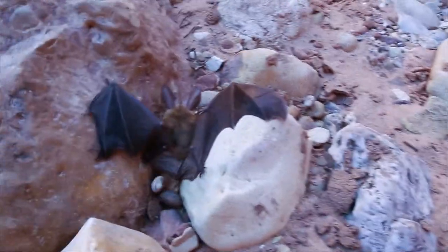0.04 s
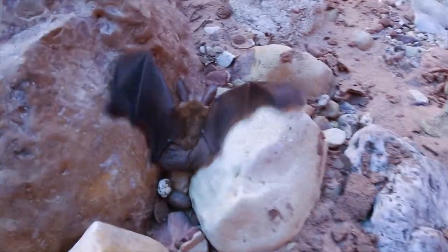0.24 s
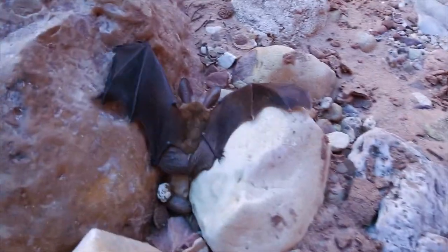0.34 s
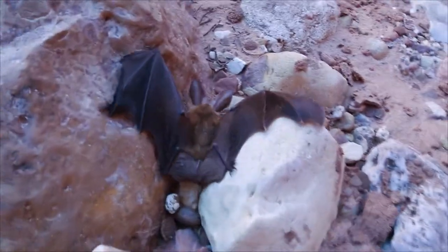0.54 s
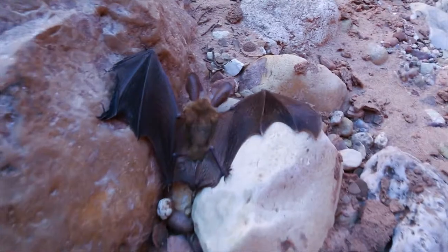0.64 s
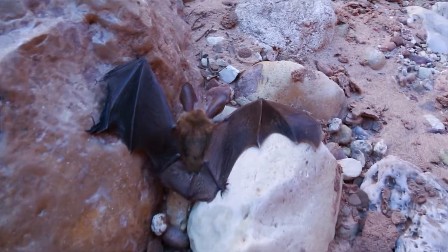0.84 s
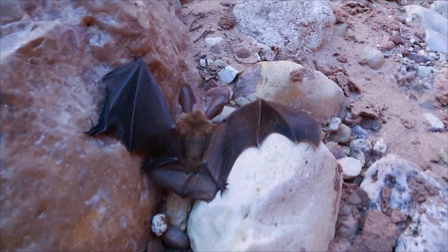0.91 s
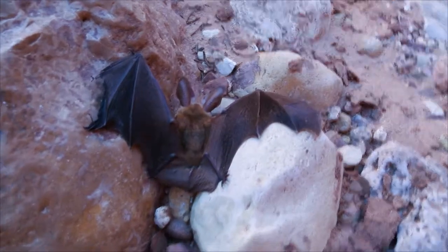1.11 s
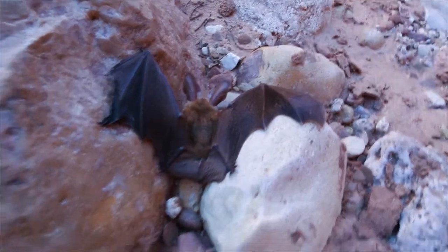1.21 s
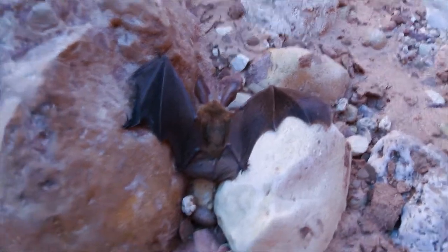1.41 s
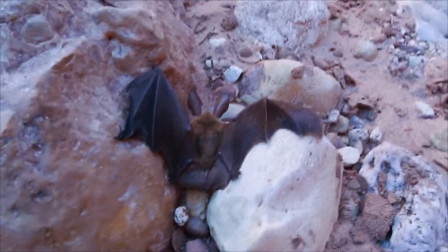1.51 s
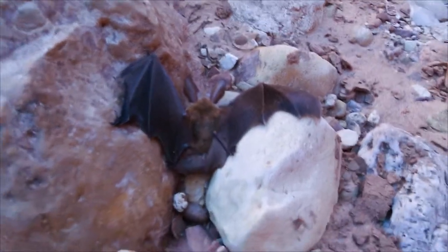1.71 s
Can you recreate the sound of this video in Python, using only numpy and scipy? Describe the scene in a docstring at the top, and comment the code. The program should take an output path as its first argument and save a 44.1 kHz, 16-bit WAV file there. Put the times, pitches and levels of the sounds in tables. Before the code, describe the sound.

A bat squeaks three times, very high and whistling, with a slight echo off rocks. Grit ticks sharply at the start. The first squeak, at 0.25 seconds, begins raspy and is held; shorter falling ones come at 0.5 and 0.7. At 0.8 the camera is knocked, followed by soft hand bumps and grit ticks until 1.1. A faint sleeve rustle and low rumble continue over quiet outdoor air.

```python
"""Grit ticks sharply, then a bat spread on a rock gives three very high squeaks.
Its voice is an almost pure whistle: the first squeak starts with a rasp and is held, the other two fall.
The rocks send back a short echo. Afterwards a hand-held camera is knocked, so that its body rings,
the hand bumps it softly and a sleeve rustles. Quiet outdoor air and a low rumble lie underneath."""
import sys
import numpy as np
from scipy import signal
from scipy.fft import rfft, irfft
from scipy.io import wavfile

SR = 44100
rng = np.random.default_rng(int(sys.argv[2]) if len(sys.argv) > 2 else 0)


def log_audio(samples):
    """Write samples as a 16-bit WAV file to the path given in sys.argv[1]."""
    # one column per channel
    frames = np.atleast_2d(samples).T
    # limit to full scale, then quantise
    limited = np.clip(frames, -1, 1)
    pcm = np.round(limited * 32767).astype(np.int16)
    wavfile.write(sys.argv[1], SR, pcm)


N = 77175
T = np.arange(N) / SR


# The path of each squeak, one list of points per squeak: time_s, pitch_hz, level_db
SQUEAK_PATHS = [
    [(.253, 13600, -20), (.2555, 13300, -7.5), (.261, 13030, -7), (.274, 12980, -7.3), (.287, 12890, -7.5),
     (.291, 12780, -10.3), (.299, 12850, -9), (.301, 13000, -7), (.306, 12840, -10), (.311, 13120, -12),
     (.3165, 12500, -22), (.321, 12000, -16), (.325, 11000, -38)],
    [(.4885, 15900, -42), (.4908, 14900, -7.5), (.494, 13800, -6), (.498, 13400, -7), (.501, 13080, -13),
     (.5035, 12650, -22), (.5062, 12000, -11.5), (.511, 11250, -15), (.513, 10950, -26), (.517, 9600, -40)],
    [(.664, 15800, -42), (.6658, 15000, -13.5), (.6675, 14350, -15), (.670, 14080, -18),
     (.6735, 13600, -36), (.675, 13330, -23), (.678, 13000, -18.5), (.682, 12350, -20.5),
     (.684, 12100, -26), (.692, 11800, -29), (.695, 11600, -42)],
]

def squeaks(wobble_hz=20):
    """The bat's voice: almost pure whistles whose pitch shakes a little."""
    out = np.zeros(N)
    for path in SQUEAK_PATHS:
        time_s, pitch_hz, level_db = np.transpose(path)
        pitch = np.interp(T, time_s, pitch_hz) + wobble_hz * flutter(rate_hz=250)
        loudness = from_db(np.interp(T, time_s, level_db))
        out += loudness * gate(time_s[0], time_s[-1], edge_s=.001) * whistle(pitch)
    return out


# Soft lower notes that come with the squeaks: start_s, length_s, start_hz, end_hz, level_db
LOWER_NOTES = [(0.238, 0.011, 9100, 8200, -23), (.294, .018, 6350, 6850, -56),
               (0.4784, 0.011, 9900, 8340, -29.5), (0.669, 0.01, 6950, 6500, -33)]

def lower_notes(wobble_hz=90, fade_db=10):
    """Short sliding notes in the bat's voice that start quickly and fade."""
    out = np.zeros(N)
    for start_s, length_s, start_hz, end_hz, level_db in LOWER_NOTES:
        progress = np.clip((T - start_s) / length_s, 0, 1)
        pitch = start_hz + (end_hz - start_hz) * progress + wobble_hz * flutter(rate_hz=600)
        loudness = from_db(level_db - fade_db * progress)
        out += loudness * gate(start_s, start_s + length_s, edge_s=.002) * whistle(pitch)
    return out


# Rough spurts of voice before the held squeak: start_s, length_s, level_db
RASP_SPURTS = [(0.2403, .0042, -13), (0.2454, .0096, -11)]
# How strong the hiss in the rasp is, from low to high: frequency_hz, level_db
RASP_HISS_SHAPE = [(300, -43), (1000, -15), (3000, -7.5), (4000, -26.5), (4700, -0.5), (5600, -23.5),
                   (7200, 7), (8700, 5.5), (10000, -12), (12500, 2.5), (16000, -0.5)]

def rasp(pulses_per_s=430, pitch_hz=13550, swing_hz=1300, jitter_hz=600):
    """The voice breaks into fast, uneven pulses, each a tiny falling chirp with hiss."""
    out = np.zeros(N)
    for start_s, length_s, level_db in RASP_SPURTS:
        cycle = ((T - start_s) * pulses_per_s + .07 * flutter(rate_hz=300)) % 1  # 0 to 1 in each pulse
        chirps = whistle(pitch_hz + swing_hz * (1 - 2 * cycle) + jitter_hz * flutter(rate_hz=1800))
        hiss = from_db(-12) * shaped_noise(RASP_HISS_SHAPE)
        pulses = 1 - .8 * np.cos(np.pi * cycle) ** 2
        spurt = gate(start_s, start_s + length_s, edge_s=.0006)
        out += from_db(level_db) * spurt * pulses * (chirps + hiss)
    return out


# Faint hisses leading into the first two squeaks: start_s, length_s, level_db, low_hz, high_hz
BREATHS = [(.198, .05, -55.5, 6500, 11510), (0.473, 0.029, -48.5, 12500, 15500)]

def breaths():
    """Air escapes before the voice catches."""
    out = np.zeros(N)
    for start_s, length_s, level_db, low_hz, high_hz in BREATHS:
        hiss = rms_one(band(rng.standard_normal(N), low_hz, high_hz))
        out += from_db(level_db) * gate(start_s, start_s + length_s, edge_s=.012) * hiss
    return out


# Dry ticks of grit: start_s, peak_db, low_hz, high_hz
GRIT_TICKS = [(.00695, -2, 6500, 10500), (.00705, -13, 2100, 4000), (.0651, -34, 1600, 4500),
              (.0680, -18, 1800, 6000), (.0901, -29, 1800, 5500), (.1047, -29, 1700, 5000),
              (.2325, -31, 11500, 15000), (.3378, -45, 4000, 11000), (.4703, -36, 9000, 15000),
              (.4912, -38, 3000, 9000), (.4944, -39, 3000, 9000), (.6245, -42, 2000, 7000),
              (.8745, -29, 1500, 3300), (.9067, -37, 1500, 9000), (.9135, -39, 3000, 11000),
              (.9293, -27, 1700, 4200), (.9296, -33, 5500, 12000), (.9715, -41, 6000, 13000),
              (1.0140, -40, 6000, 14000), (1.0504, -22, 1500, 4800), (1.0538, -33, 6000, 11000),
              (1.0636, -34, 6000, 11000), (1.0658, -26, 6000, 11500)]

def grit_ticks():
    """Each tick of grit is a snap, a brief crumble and a faint tail."""
    out = np.zeros(N)
    crumble = from_db(-16) * dying(fade_s=.0035)
    tail = from_db(-37) * dying(fade_s=.028)
    for start_s, peak_db, low_hz, high_hz in GRIT_TICKS:
        snap = signal.unit_impulse(N) + (crumble + tail) * rng.standard_normal(N)
        tick = band(snap, low_hz, high_hz)
        tick = band(tick, 1500, 14500, order=4)  # outer limits shared by all ticks
        out += at(start_s, from_db(peak_db) * tick / np.abs(tick).max())
    return out


# The clear echo from the rocks: delay_s, level_db
ROCK_ECHOES = [(.0258, -26)]
# Sound scattered by stony ground, near and far: level_db, fade_s
GROUND_SCATTER = [(-27.5, .12), (-34, .32)]

def rock_echo(sound, build_s=.01):
    """Sound bounces off the rocks once clearly, and off the stony ground as a faint blur."""
    build_up = np.clip(T / build_s, 0, 1)
    scatter = sum(from_db(level_db) * rms_one(rng.standard_normal(N) * dying(fade_s) * build_up)
                  for level_db, fade_s in GROUND_SCATTER)
    blur = signal.fftconvolve(sound, band(scatter, 1500, 13800) / np.sqrt(N))[:N]
    echo = sum(from_db(level_db) * at(delay_s, sound) for delay_s, level_db in ROCK_ECHOES)
    return echo + blur


# Knocks on the camera: start_s, level_db, low_hz, high_hz
CAMERA_KNOCKS = [(0.8017, -3, 238, 3980), (0.8413, -26.5, 375, 746), (0.8412, -32, 1500, 2570),
                 (.8445, -36.5, 2800, 4370), (1.0515, -19, 3240, 4300), (1.0575, -41, 3050, 3600)]
# The tones the camera body rings with: pitch_hz, level_db, fade_s
CAMERA_TONES = [(304, -22, 0.0094), (756, -14, 0.01), (1319, -19.5, 0.037), (2285, -1.5, 0.0041),
                (2886, -3.5, 0.006), (3290, -26, 0.048), (4350, -23, 0.011)]

def camera_knocks():
    """A knock sets the camera ringing; where and how hard it lands picks which tones sound."""
    out = np.zeros(N)
    body = sum(fading_tone(pitch_hz, level_db, fade_s) for pitch_hz, level_db, fade_s in CAMERA_TONES)
    crack = from_db(-23) * band(rng.standard_normal(N) * dying(fade_s=.0043), 6900, 11200)
    for start_s, level_db, low_hz, high_hz in CAMERA_KNOCKS:
        ring = band(body, low_hz, high_hz)
        out += at(start_s, from_db(level_db) * (ring / np.abs(ring).max() + crack))
    return out


# Soft bumps of the hand: start_s, level_db, pitch_hz, fade_s
HAND_BUMPS = [(0.7857, -19, 238, 0.0062), (0.8414, -27, 194, 0.02), (0.905, -30.5, 190, 0.026),
              (1.0498, -29.5, 85, 0.051), (1.0617, -34.5, 293, 0.0088)]

def hand_bumps():
    """The hand pushes on the camera, making low thuds that die almost at once."""
    thuds = sum(at(start_s, fading_tone(pitch_hz, level_db, fade_s))
                for start_s, level_db, pitch_hz, fade_s in HAND_BUMPS)
    return band(thuds, 45, 2700)


# How the rustle swells and sinks: time_s, level_db
SLEEVE_LEVELS = [(.74, -74), (.81, -49.5), (.868, -43.5), (.895, -53.5), (.93, -50), (.955, -56.5),
                 (.99, -45), (1.035, -56), (1.062, -40.5), (1.09, -49), (1.125, -45), (1.185, -61.5),
                 (1.255, -41), (1.315, -56), (1.345, -50.5), (1.39, -56), (1.75, -72)]
# How strong the cloth's hiss is, from low to high: frequency_hz, level_db
SLEEVE_SHAPE = [(100, -11), (300, 2.5), (600, -4.5), (1000, -5.5), (2000, -4), (3200, -1), (4500, -8),
                (6000, -19.5), (10000, -16), (13000, -23.5), (16000, -49)]

def sleeve_rustle(catches_per_s=400, spread_db=4.5):
    """Cloth slides with a soft hiss, and its fibres catch with tiny clicks."""
    sizes = from_db(spread_db * np.minimum(rng.exponential(1, N), 2))
    signs = rng.choice([-1, 1], N)
    caught = rng.random(N) < catches_per_s / SR
    clicks = from_db(-12) * rms_one(band(sizes * signs * caught, 2000, 18000))
    return level_curve(SLEEVE_LEVELS) * (shaped_noise(SLEEVE_SHAPE) + clicks)


# How strong the outdoor air is, from low to high: frequency_hz, level_db
AIR_SHAPE = [(25, -26.5), (55, -6), (75, -6.5), (105, 3), (160, -4.5), (330, -12.5), (700, -14.5),
             (1100, -15.5), (1530, -13.5), (1700, -7), (1880, -9), (2080, -13.5), (2400, -9), (2800, -20.5),
             (3250, -16), (3500, -8), (3720, -8), (4000, -21.5), (5000, -27), (9000, -28.5), (15800, -30.5)]
# How loud the air is, dipping a little around the loud squeaks: time_s, level_db
AIR_LEVELS = [(0, -52), (.24, -52.5), (.3, -54.5), (.53, -54.5), (.64, -51.5), (1.75, -53)]

def outdoor_air():
    """The quiet, nearly steady hush of the outdoors."""
    return level_curve(AIR_LEVELS) * shaped_noise(AIR_SHAPE)


# How loud the rumble is: time_s, level_db
RUMBLE_LEVELS = [(0, -84), (.74, -68.5), (.82, -50), (1.0, -52), (1.3, -50), (1.42, -49), (1.6, -48),
                 (1.75, -52)]
# How strong the rumble is, from low to high: frequency_hz, level_db
RUMBLE_SHAPE = [(25, -26), (60, -12.5), (130, 0.5), (230, -3.5), (340, -11.5), (540, -8), (800, -19.5),
                (1500, -18), (1710, -7), (2000, -17.5), (3000, -19.5), (3700, -14.5), (4200, -35.5),
                (5500, -43), (16000, -66)]

def rumble():
    """A low noise that rises once the camera moves."""
    return level_curve(RUMBLE_LEVELS) * shaped_noise(RUMBLE_SHAPE)


def from_db(db):
    """Turn decibels into a number to multiply by."""
    return 10 ** (np.asarray(db) / 20)


def rms_one(x):
    """Scale a sound so that its average strength (rms) is 1."""
    return x / np.sqrt(np.mean(x ** 2) + 1e-20)


def level_curve(points):
    """Join time_s, level_db points into a volume curve."""
    return from_db(np.interp(T, *np.transpose(points)))


def band(x, low_hz, high_hz, order=2):
    """Keep the part of a sound between low_hz and high_hz."""
    sections = signal.butter(order, [low_hz, high_hz], "band", fs=SR, output="sos")
    return signal.sosfilt(sections, x + 1e-18)


def shaped_noise(shape):
    """Noise of strength 1, shaped by frequency_hz, level_db points."""
    frequency_hz, level_db = np.transpose(shape)
    bins_hz = np.maximum(np.fft.rfftfreq(N, 1 / SR), 1)
    gains = from_db(np.interp(np.log(bins_hz), np.log(frequency_hz), level_db))
    return rms_one(irfft(rfft(rng.standard_normal(N)) * gains, N))


def dying(fade_s):
    """A fade that drops by 60 dB in fade_s."""
    return np.exp(-np.log(1000) * T / fade_s)


def fading_tone(pitch_hz, level_db, fade_s):
    """A pure tone that starts at once and dies away."""
    return from_db(level_db) * dying(fade_s) * np.sin(2 * np.pi * pitch_hz * T)


def at(start_s, x):
    """Delay a sound so that it begins at start_s."""
    return np.concatenate([np.zeros(int(start_s * SR)), x])[:N]


def whistle(pitch_hz):
    """A pure tone that follows a pitch curve."""
    return np.sin(2 * np.pi * np.cumsum(pitch_hz) / SR)


def flutter(rate_hz):
    """A smooth random wobble of strength 1."""
    smoothing = signal.butter(2, rate_hz, fs=SR, output="sos")
    return rms_one(signal.sosfilt(smoothing, rng.standard_normal(N)))


def gate(start_s, end_s, edge_s):
    """Turn on at start_s and off at end_s, with rounded edges."""
    return np.sin(np.pi / 2 * np.clip(np.minimum(T - start_s, end_s - T) / edge_s, 0, 1)) ** 2


def scene():
    """The bat and the grit echo among the rocks; the camera and sleeve are close by, with no echo."""
    bat = squeaks() + lower_notes() + rasp() + breaths()
    grit = grit_ticks()
    echoes = rock_echo(bat + from_db(-7) * grit)
    handling = camera_knocks() + hand_bumps() + sleeve_rustle()
    return (bat + grit + echoes + handling + outdoor_air() + rumble())[None]


def record(dry, cutoff_hz=16200):
    """Cut away the very highest treble steeply."""
    return signal.sosfiltfilt(signal.ellip(10, .05, 60, cutoff_hz, fs=SR, output="sos"), dry)


dry = scene()
out = record(dry)
log_audio(out)
```